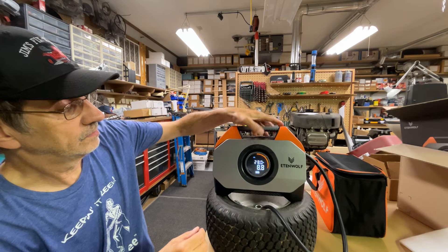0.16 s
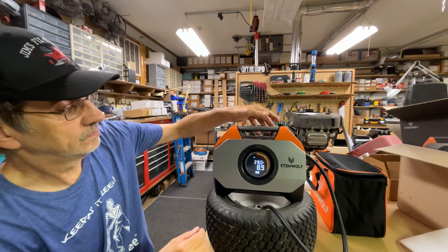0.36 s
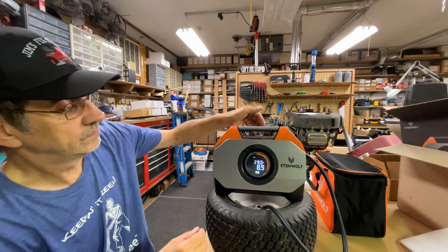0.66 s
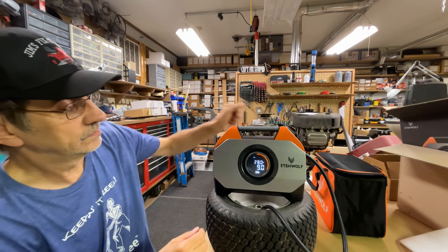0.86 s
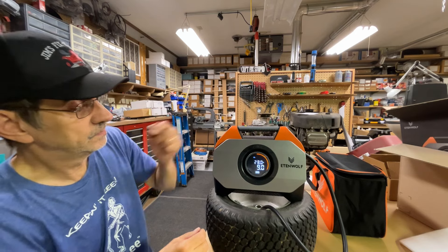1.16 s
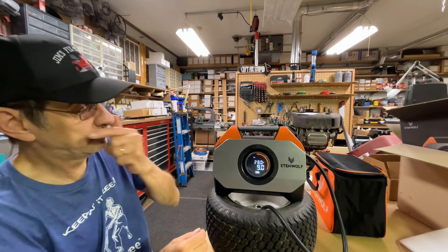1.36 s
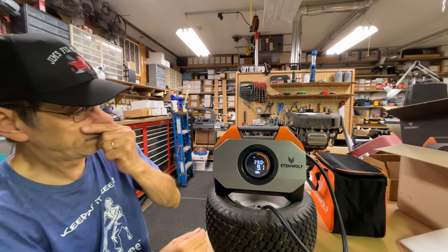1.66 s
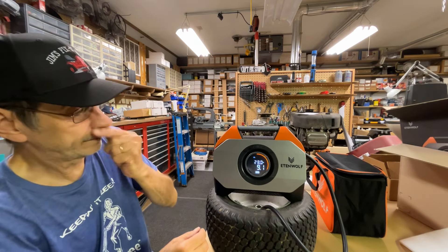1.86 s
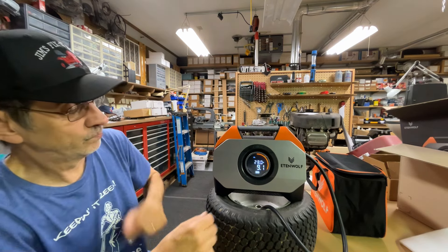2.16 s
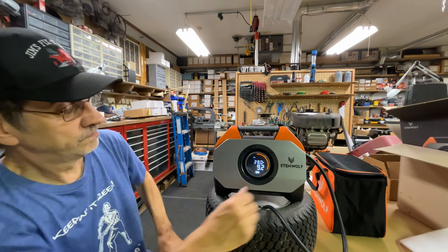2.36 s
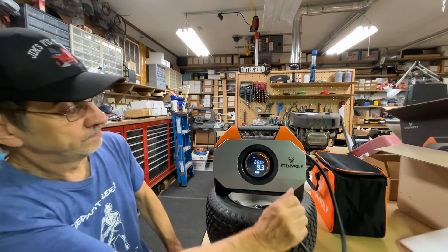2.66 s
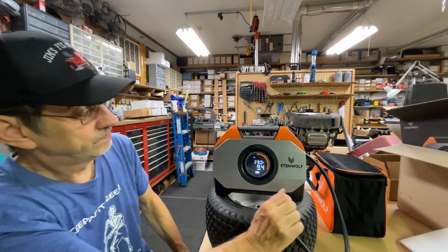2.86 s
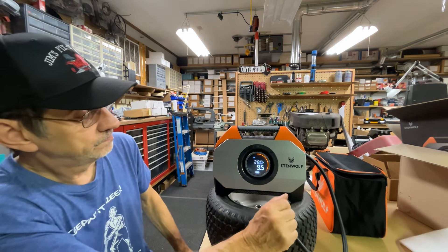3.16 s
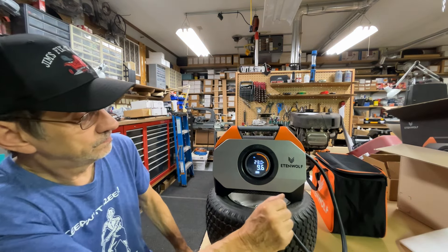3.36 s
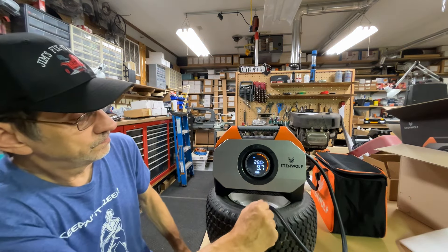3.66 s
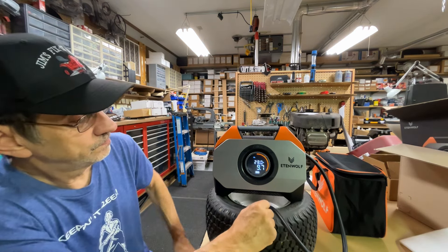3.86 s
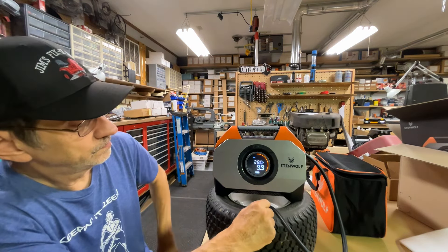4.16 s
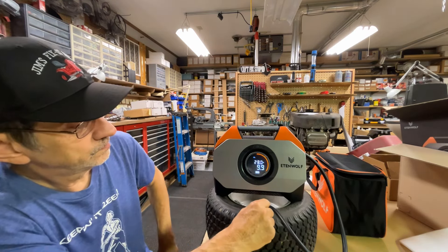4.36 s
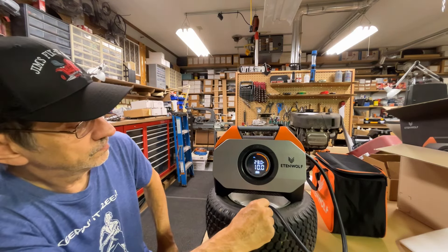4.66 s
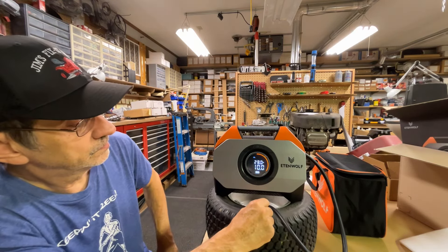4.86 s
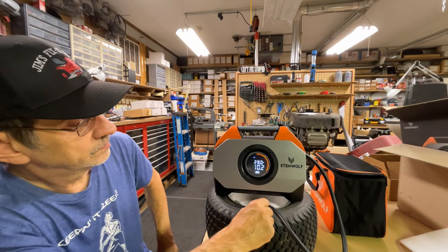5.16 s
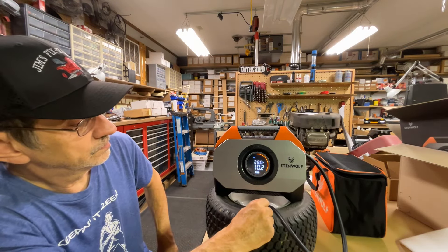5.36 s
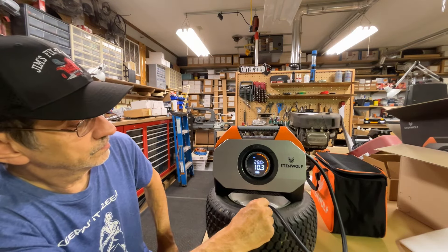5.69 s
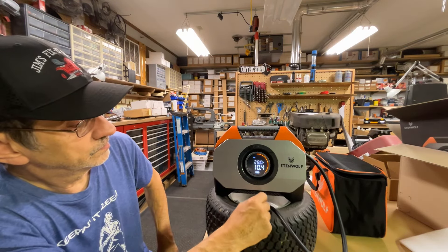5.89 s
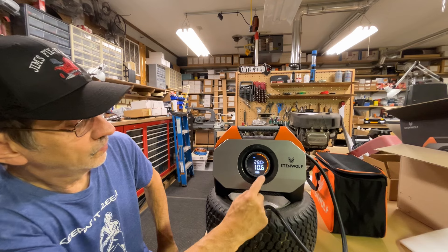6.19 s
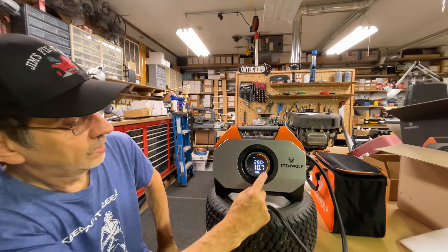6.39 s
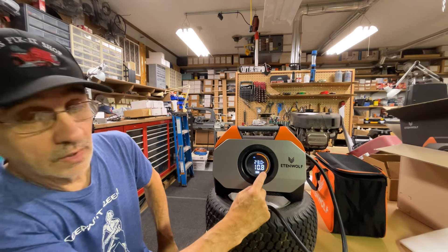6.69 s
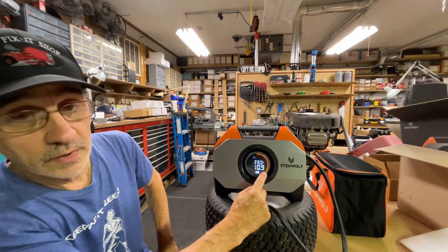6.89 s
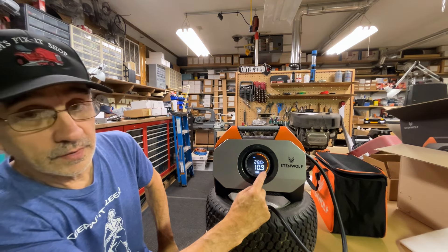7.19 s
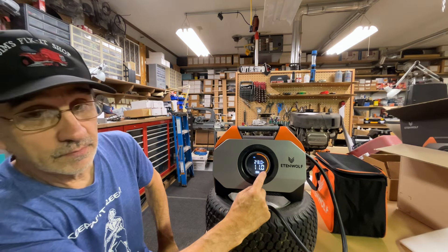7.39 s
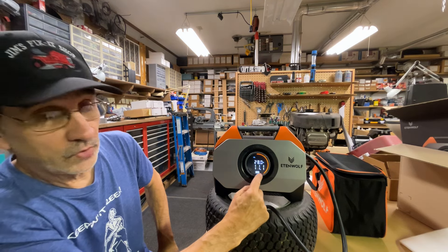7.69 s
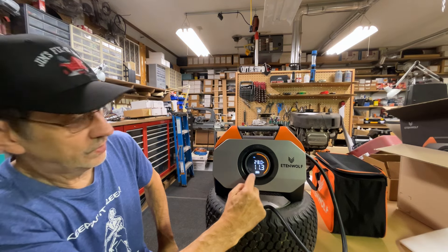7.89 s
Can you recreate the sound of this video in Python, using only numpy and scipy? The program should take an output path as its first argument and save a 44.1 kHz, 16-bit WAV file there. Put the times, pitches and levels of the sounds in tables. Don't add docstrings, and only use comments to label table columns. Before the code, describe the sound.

A small electric air pump runs steadily close up, a buzzing drone of fast piston strokes with gear whine, casing rattle and airy hiss.

```python
import sys
import numpy as np
from scipy import signal
from scipy.fft import rfft, irfft, next_fast_len
from scipy.io import wavfile
from scipy.ndimage import uniform_filter1d, map_coordinates

SR = 44100
rng = np.random.default_rng(int(sys.argv[2]) if len(sys.argv) > 2 else 0)


def file_out(sig):
    cols = np.atleast_2d(sig).T
    lim = np.clip(cols, -1, 1)
    pcm = np.round(lim * 32767).astype(np.int16)
    wavfile.write(sys.argv[1], SR, pcm)


def decibels_to_gain(level_db):
    exponent = np.asarray(level_db, float) / 20
    return 10 ** exponent


N = 354563

WHEEL_TEETH, PINION_TEETH = 40, 11
# time_s, crank_turns_per_s
CRANK_SPEED = [(0, 74.5), (.3, 74.75), (.44, 73.8), (.66, 74.55), (.92, 73.4), (1.45, 73.0), (1.7, 73.75),
               (2.12, 73.2), (2.26, 74.2), (2.5, 73.55), (3.12, 73.25), (3.25, 74.0), (3.42, 73.1),
               (4.3, 73.55), (4.95, 73.45), (5.2, 73.7), (7.2, 73.78), (8.04, 73.7)]
# crank_order, level_db
PISTON_ORDERS = [(1, -66.1), (2, -38.1), (3, -57.8), (4, -28.0), (5, -32.7), (6, -46.0), (7, -59.4),
                 (8, -39.9), (9, -36.6), (10, -36.3), (11, -51.6), (12, -29.6), (13, -37.0), (14, -34.3),
                 (15, -39.0), (16, -43.3), (17, -44.0), (18, -36.5), (19, -33.3), (20, -43.6), (21, -44.8),
                 (22, -48.9), (23, -46.5), (24, -42.6), (25, -48.8), (26, -54.9), (27, -46.3), (28, -45.2),
                 (29, -46.3), (30, -54.1), (31, -47.5), (32, -43.7)]
# crank_order, slack_to_firm_db
TYRE_SHIFT = [(2, -1.5), (4, -3), (5, -1), (8, 1.5), (9, 3.5), (12, 0), (14, -3.5), (15, -2.5), (18, 4.5),
              (19, -2.5)]
# time_s, half_width_s, lowest_orders_db
FINGER_PRESS = [
    (7.712, .015, 2),
    (7.755, .02, -10),
]
# shaft_order, level_db
MOTOR_ORDERS = [(1, -63), (3, -30), (7, -45.5), (9, -51), (12, -53)]
# crank_order_added_to_shaft, level_db
SUM_ORDERS = [(-2, -55), (1, -51), (2, -55), (6, -47.5), (8, -43), (9, -42), (13, -49), (14, -62),
              (21, -65), (26, -49), (28, -63), (30, -45)]
# crank_order_less_shaft, level_db
DIFFERENCE_ORDERS = [(8, -67), (9, -54), (13, -45.5), (14, -67), (20, -59)]
# time_s, level_db
TOOTH_CONTACT = [
    (0, -5.5),
    (.68, -5.5),
    (.9, 2),
    (2.1, 0.5),
    (4.0, -0.5),
    (4.4, 2.5),
    (6.3, 1.5),
    (6.9, -2),
    (7.4, 0.5),
    (8.04, -1),
]
# crank_order, level_db
RUNOUT_ORDERS = [(33, -48.0), (34, -49.6), (35, -51.7), (36, -47.4), (37, -52.9), (38, -44.8), (39, -42.5),
                 (41, -43.1), (45, -44.3), (47, -46.0), (49, -50.7), (50, -51.6), (51, -51.6), (63, -55.6),
                 (67, -58.3), (74, -61.2), (78, -54.4), (79, -52.0), (81, -57.4), (82, -61.3)]
# pitch_hz, level_db_per_hz
CASING_SPECTRUM = [(30, -95.7), (60, -89.8), (100, -81), (125, -78), (200, -77.5), (250, -65), (340, -61.5),
                   (400, -63.5), (480, -71), (540, -66), (650, -56), (770, -59), (940, -50), (1060, -50.5)]
# pitch_hz, width_hz, lift_db
CASING_HOLLOWS = [(452, 30, -4.5), (500, 22, -2), (576, 17, -4), (615, 25, -6.5), (802, 60, -5),
                  (998, 19, -2.5), (1050, 30, -4), (1170, 35, -2.5), (657, 60, 2.5)]
# pitch_hz, level_db_per_hz
GEARBOX_SPECTRUM = [(1180, -60.5), (1300, -51.5), (1420, -55.5), (1650, -56), (1950, -60.5), (2150, -56.5),
                    (2380, -56), (2600, -57.5), (2900, -55), (3150, -55.5), (3350, -56), (3700, -57),
                    (4000, -63), (4350, -65)]
# pitch_hz, width_hz, lift_db
GEARBOX_PANELS = [(1592, 62, 4), (3840, 51, 4), (2970, 29, -10), (1730, 45, -5.5), (1945, 40, -2.5),
                  (1510, 50, -4), (2400, 120, 2), (2260, 43, -7.5), (2700, 60, -6), (3190, 50, -6.5),
                  (3380, 44, -7.5), (3330, 80, 5.5), (3680, 50, -3), (3710, 80, 3)]
# pitch_hz, level_db_per_hz
HISS_SPECTRUM = [(4350, -67.5), (4750, -65.5), (5300, -68.5), (5700, -71.5), (6250, -72.5), (6700, -67.5),
                 (7400, -66), (8000, -71.5), (8700, -71.5), (9600, -76.5), (10400, -76.5), (11000, -69),
                 (13000, -73), (15600, -71)]
# pitch_hz, width_hz, lift_db
THIN_PARTS = [(7100, 200, -2.5), (8240, 120, 5.5), (8460, 60, 4.5), (11000, 50, 3), (11670, 65, 8.5),
              (12000, 130, 8.5), (12540, 100, 8.5), (13600, 120, 8), (14300, 60, 0), (14600, 120, 8),
              (15000, 90, 4), (5870, 160, 8), (4680, 70, 6), (4780, 28, -7), (5150, 80, 2), (4870, 54, 5),
              (6430, 250, 1.5), (10880, 60, 0.5), (13750, 40, 2), (12900, 300, -3)]


def unit(x):
    return x / np.sqrt(np.mean(x ** 2) + 1e-20)


def curve(rows):
    time_s, value = np.transpose(rows)
    return np.interp(np.arange(N) / SR, time_s, value)


def wobble(rate):
    knots = rng.standard_normal(int(N * rate / SR) + 4)
    return map_coordinates(knots, [np.arange(N) * rate / SR], order=1)


def tyre_fill():
    return np.linspace(-.5, .5, N)


def arm_shade():
    arm_s, move_s = 2.45, 0.092
    return 1 / (1 + np.exp((arm_s - np.arange(N) / SR) / (move_s / 2)))


def tone(angle, db, drift_db, slip, start=None):
    if start is None:
        start = rng.uniform(0, 2 * np.pi)
    gain = np.sqrt(2) * decibels_to_gain(db + drift_db * wobble(1.94))
    return gain * np.cos(angle + start + slip * wobble(25))


def piston(crank):
    t = np.arange(N) / SR
    tyre_db = {k: db * tyre_fill() for k, db in TYRE_SHIFT}
    tyre_db[18] = tyre_db[18] - 1.3 * curve(TOOTH_CONTACT)
    rock_db = sum(db * np.exp(-.5 * ((t - s) / width) ** 2) for s, width, db in FINGER_PRESS)
    drum_db = 9 * np.exp(-t / 1.1) - 1.0
    drum_share = {6: .4, 7: 1.7}
    strokes = 0
    for k, db in PISTON_ORDERS:
        order_db = db + tyre_db.get(k, 0) + drum_share.get(k, 0) * drum_db
        if k <= 4:
            order_db = order_db + rock_db * 2 / k
        start = .4 + .7 * (4 < k < 11)
        start += np.pi * (k in (1, 2, 3, 6))
        start += (.3 if k < 15 else 2) * rng.standard_normal()
        strokes = strokes + tone(k * crank, order_db, drift_db=.3 + .03 * k, slip=.008 * k, start=start)
    return strokes


def motor(crank):
    shaft = crank * WHEEL_TEETH / PINION_TEETH
    own = sum(tone(k * shaft, db, drift_db=0.7, slip=0.054) for k, db in MOTOR_ORDERS)
    above = sum(tone(shaft + k * crank, db, drift_db=1.5 + 0.068 * k, slip=.08) for k, db in SUM_ORDERS)
    below = sum(tone(k * crank - shaft, db, drift_db=-1.5, slip=.2) for k, db in DIFFERENCE_ORDERS)
    return own + above + below


def gears(crank):
    mesh_db = curve(TOOTH_CONTACT)
    side_db = 2.5 - 0.26 * mesh_db + 9 * tyre_fill() - 6 * (arm_shade() - .7)
    second_db = .3 * mesh_db + 7 * tyre_fill() + 2 * wobble(3)
    whine = tone(WHEEL_TEETH * crank, -31.3 + mesh_db + 2 * wobble(14), drift_db=.5, slip=.4)
    octave = tone(2 * WHEEL_TEETH * crank, -46.0 + second_db, drift_db=2.0, slip=1.0)
    sidebands = 0
    for k, db in RUNOUT_ORDERS:
        near_whine = abs(k - WHEEL_TEETH) < 2
        near_octave = abs(k - 2 * WHEEL_TEETH) < 3
        order_db = db + side_db * near_whine + (second_db + 2) * near_octave
        sidebands = sidebands + tone(k * crank, order_db, drift_db=-1.7, slip=0.27)
    return whine + octave + sidebands


def shaped(x, points, bumps=()):
    size = next_fast_len(N + 8192)
    hz = np.fft.rfftfreq(size, 1 / SR)
    point_hz, point_db = np.transpose(points)
    db = np.interp(np.log(hz + 1), np.log(point_hz + 1), point_db, left=-200, right=-200)
    for centre, width, lift in bumps:
        db = db + lift / (1 + (2 * (hz - centre) / width) ** 2)
    return unit(irfft(rfft(x, size) * decibels_to_gain(db), size)[:N])


def patchy(comb_db, puff_db):
    z = signal.stft(rng.standard_normal(N + 2048), nperseg=1024)[2]

    def field(bins, frames):
        across = uniform_filter1d(rng.standard_normal(z.shape), bins, 0)
        return unit(uniform_filter1d(across, frames, 1))

    gain_db = comb_db * field(2, 120) + puff_db * field(24, 3)
    return unit(signal.istft(z * decibels_to_gain(gain_db), nperseg=1024)[1][:N])


def throbbing(crank, once, twice, lag, uneven_db, comb_db, puff_db):
    stroke = 1 + once * np.cos(crank - lag) + twice * np.cos(2 * (crank - lag))
    return stroke * decibels_to_gain(uneven_db * wobble(70)) * patchy(comb_db, puff_db)


def tooth_clatter(crank, fade, top_order):
    size = 256 * PINION_TEETH
    line = np.arange(size // 2 + 1)
    beat = (8 * line + 5) % PINION_TEETH - 5
    weight = (beat != 0) / (1 + fade * np.abs(beat))
    weight = weight / (1 + (line / PINION_TEETH / top_order) ** 4)
    first, second = irfft(weight * rfft(rng.standard_normal((2, size))), size)
    place = crank / (2 * np.pi * PINION_TEETH) % 1 * size
    wear = np.linspace(0, np.pi / 2, N)
    first_read = map_coordinates(first, [place], mode="grid-wrap")
    second_read = map_coordinates(second, [place], mode="grid-wrap")
    return unit(np.cos(wear) * first_read + np.sin(wear) * second_read)


def level(db, fill_db, arm_db, sway_db):
    return decibels_to_gain(db + fill_db * (tyre_fill() + .5) + arm_db * arm_shade() + sway_db * wobble(1.5))


def rattle(crank):
    knock = throbbing(crank, once=.1, twice=.12, lag=.1, uneven_db=.1, comb_db=.5, puff_db=.1)
    shake = throbbing(crank, once=0.12, twice=0.14, lag=-2.56, uneven_db=1.2, comb_db=2.0, puff_db=0.73)
    clatter = tooth_clatter(crank, fade=0.4, top_order=39)
    casing = shaped(knock + decibels_to_gain(-11.5) * clatter, CASING_SPECTRUM + GEARBOX_SPECTRUM[:1], CASING_HOLLOWS)
    gearbox = shaped(shake + decibels_to_gain(-12.0) * clatter, GEARBOX_SPECTRUM, GEARBOX_PANELS)
    casing = casing * level(-27.5, fill_db=-1.5, arm_db=.5, sway_db=0.8)
    gearbox = gearbox * level(-23, fill_db=-.5, arm_db=-1.5, sway_db=.3)
    return casing + gearbox


def hiss(crank):
    blow = throbbing(crank, once=0.2, twice=0.1, lag=-1.5, uneven_db=0.83, comb_db=0.8, puff_db=0.78)
    seep = throbbing(crank, once=0.074, twice=0.13, lag=-2.1, uneven_db=0.4, comb_db=1.7, puff_db=1.0)
    valve = shaped(blow, HISS_SPECTRUM[:10], THIN_PARTS)
    leak = shaped(seep, HISS_SPECTRUM[9:] + [(15730, -72)], THIN_PARTS)
    valve = valve * level(-31, fill_db=-.5, arm_db=-0.5, sway_db=0.36)
    leak = leak * level(-32, fill_db=-0.5, arm_db=-.3, sway_db=-0.3)
    return valve + leak


def scene():
    turns_per_s = curve(CRANK_SPEED) + .15 * wobble(14)
    crank = 2 * np.pi * np.cumsum(turns_per_s) / SR
    mix = piston(crank) + motor(crank) + gears(crank) + rattle(crank) + hiss(crank)
    return mix[None]


def roll_off(x):
    return signal.sosfilt(signal.butter(12, 16610, fs=SR, output="sos"), x)


def record(dry):
    return roll_off(dry)


dry = scene()
out = record(dry)
file_out(out)
```